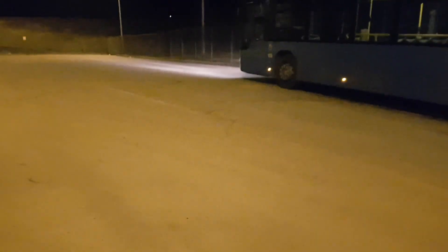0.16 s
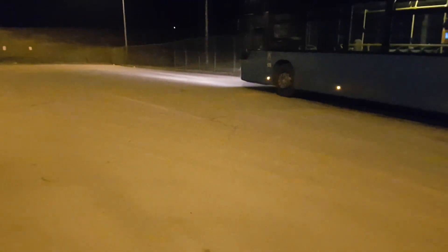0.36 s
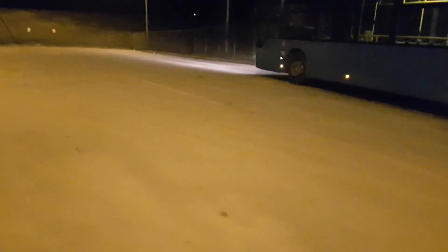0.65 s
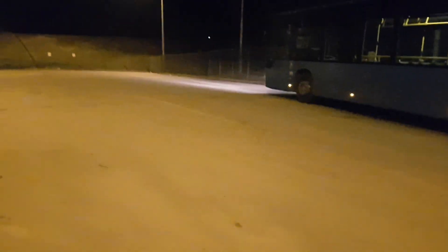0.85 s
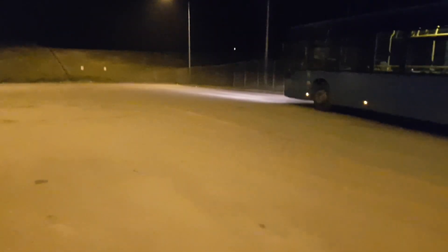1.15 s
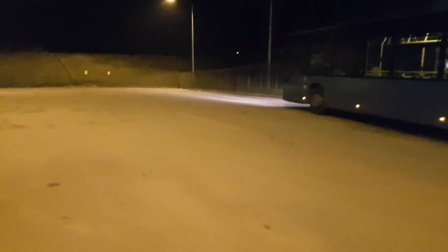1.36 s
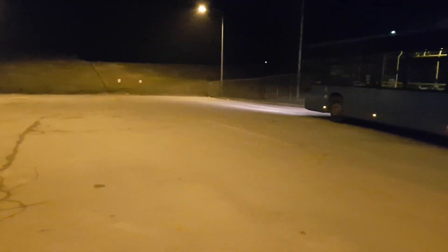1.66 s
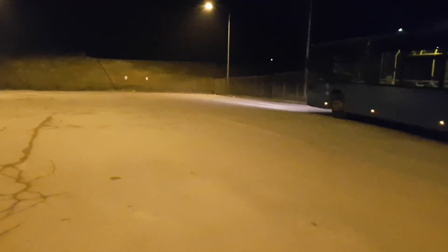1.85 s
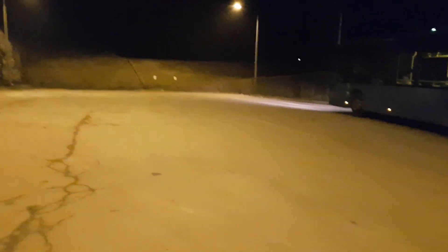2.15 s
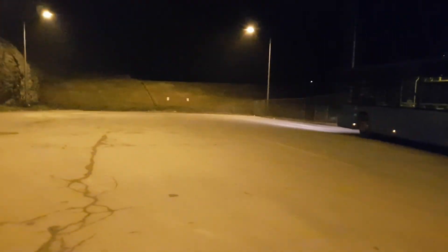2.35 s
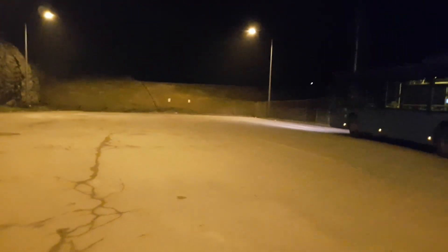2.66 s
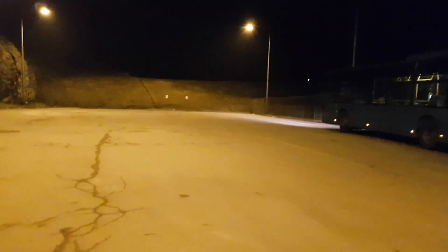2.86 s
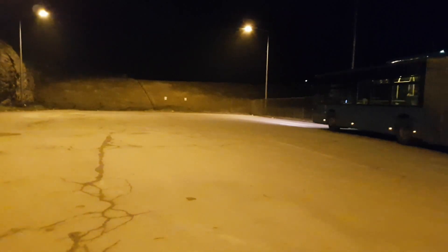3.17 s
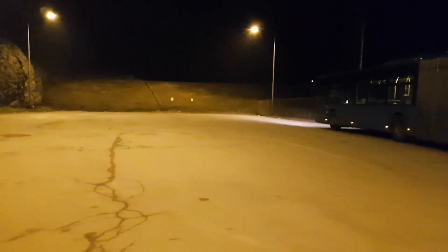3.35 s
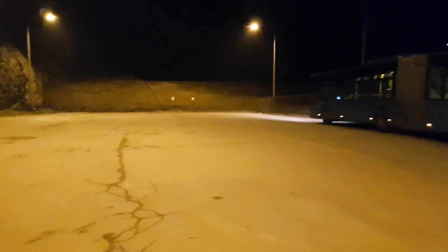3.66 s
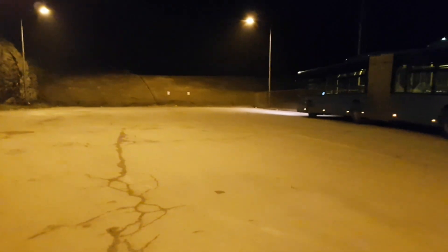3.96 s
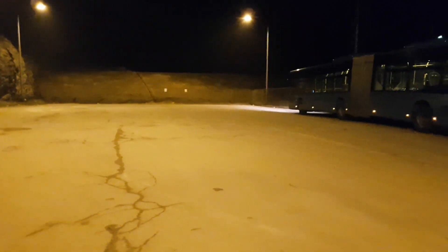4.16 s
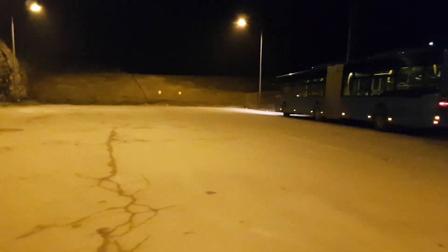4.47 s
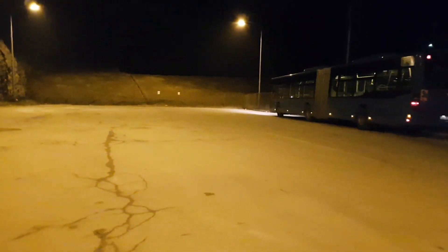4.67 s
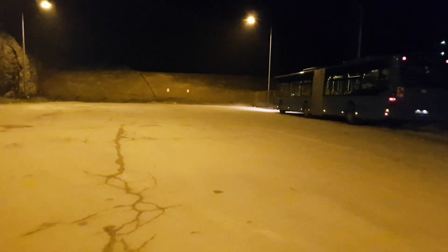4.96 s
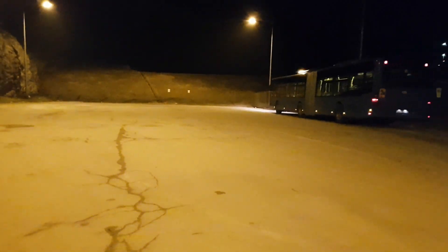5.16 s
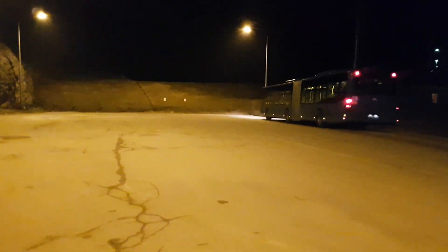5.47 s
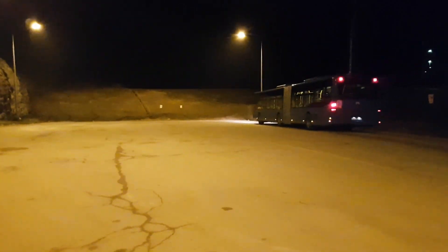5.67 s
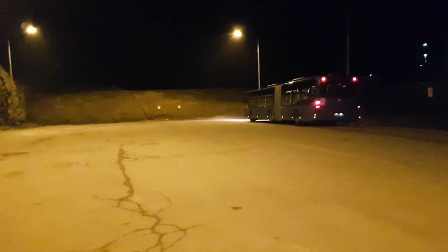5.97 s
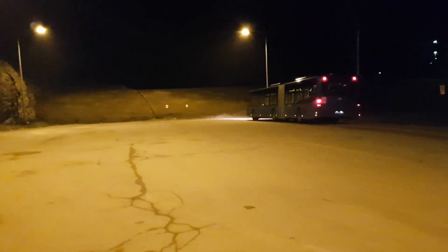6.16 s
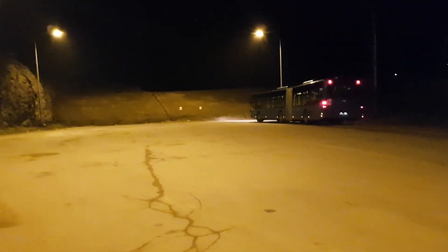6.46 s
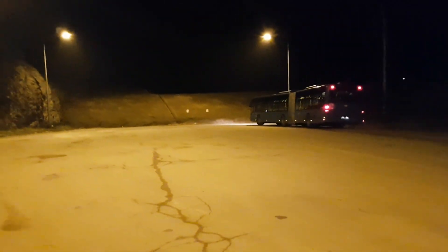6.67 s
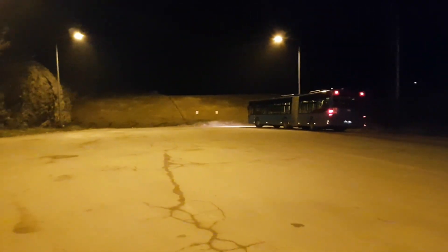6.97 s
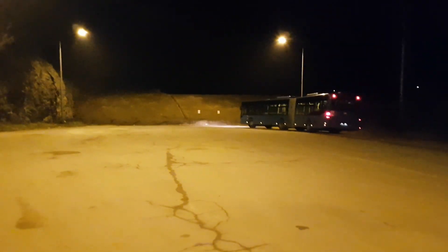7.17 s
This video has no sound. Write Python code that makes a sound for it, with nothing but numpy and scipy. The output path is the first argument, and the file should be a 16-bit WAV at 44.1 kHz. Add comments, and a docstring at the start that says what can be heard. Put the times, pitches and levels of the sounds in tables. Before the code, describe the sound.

Outdoors, a spaced microphone pair hears a heavy bus pulling away under power: deep throbbing exhaust, knocking diesel clatter, broad fan noise and geared whines rising together. After the driver lifts off, the whine sags and breaks up, leaving distant soft rumble and a faint fluttering axle hum, with small swells of roar at the end and occasional grit ticks.

```python
"""Articulated bus pulling away

A paved lot: a rear-engined diesel bus pulls away hard from about 8 m, lifts off and rolls on beyond 20 m.
Six unequal cylinders drive a booming exhaust and a clattering block; geared belt drives whine, the turbo
whistles with the revs, the tyres flick grit and the axle gears hum on the overrun.
A spaced pair of microphones hears the bus move from the right side towards the front."""
import sys
import numpy as np
from scipy import signal
from scipy.io import wavfile
from scipy.ndimage import uniform_filter1d, map_coordinates

SR = 44100
rng = np.random.default_rng(int(sys.argv[2]) if len(sys.argv) > 2 else 0)


def wrap_up_sound(samples):
    """Save the sound to the file named by the first command line argument, as 16-bit audio."""
    columns = np.atleast_2d(samples).T
    # keep every value between -1 and 1, then stretch to whole-number steps
    tamed = np.clip(columns, -1, 1)
    steps = np.round(tamed * 32767).astype(np.int16)
    wavfile.write(sys.argv[1], SR, steps)


N = 322812


def from_db(db):
    """Decibels to gain."""
    return 10 ** (np.asarray(db) / 20)


def rms_one(x):
    """Scale to unit rms."""
    return x / np.sqrt(np.mean(x ** 2) + 1e-20)


def steady(x):
    """Level out the power, averaged over half a second and over the channels, to about one."""
    power = np.mean(np.atleast_2d(x) ** 2, axis=0)
    return x / np.sqrt(uniform_filter1d(power, SR // 2) + 1e-20)


def in_time(rows):
    """Turn rows of (time, values...) into one curve per value column."""
    s, *columns = np.transpose(rows)
    return [np.interp(np.arange(N) / SR, s, c) for c in columns]


def at_hz(points, hz, column=1):
    """Read a column of a spectrum on a log-frequency axis."""
    table = np.array(points)
    return np.interp(np.log(hz), np.log(table[:, 0]), table[:, column])


def drift(rate_hz):
    """Smooth random wandering of spread one, drawn at every 40th sample."""
    step = 40
    pole = np.exp(-2 * np.pi * step * rate_hz / SR)
    settle = 2000  # discarded while the filter settles
    white = rng.standard_normal(N // step + settle + 2)
    slow = signal.lfilter([1], [1, -2 * pole, pole * pole], white)[settle:]
    return np.interp(np.arange(N) / step, np.arange(len(slow)), rms_one(slow))


def tone(turns, rough, flutter):
    """A unit-rms line with a share (rough) of side bands that flutter at random (flutter in Hz)."""
    angle = 2 * np.pi * (turns + rng.random())
    in_phase = (1 + rough * drift(flutter)) * np.sin(angle)
    quadrature = rough * drift(flutter) * np.cos(angle)
    return np.sqrt(2 / (1 + 2 * rough ** 2)) * (in_phase + quadrature)


def resonant_db(resonances, hz):
    """Level of a tone as its pitch sweeps through a set of resonances, whose powers add."""
    power = 0
    for centre, half_width, db in resonances:
        power = power + (from_db(db) / (1 + ((hz - centre) / half_width) ** 2)) ** 2
    return 10 * np.log10(power)


# microphone pair, left over right: (frequency [Hz], level difference [dB])
EAR_BALANCE = [(60, -0.8), (200, -1), (450, -0.5), (800, 0.9), (1300, 2.5), (1900, -3), (2450, -7.5),
               (3300, 2), (4600, 1), (8500, -2), (15000, -3)]


def ears(hz):
    """Left and right gain of the microphones at a frequency."""
    return from_db(at_hz(EAR_BALANCE, hz) * np.array([[.5], [-.5]]))


# side of the bus that faces the microphones: (time [s], aspect [0 flank, 1 tail, 2 far])
BUS_ASPECT = [(0, 0.1), (2.7, 0.05), (3.6, 0.77), (4.8, 1.16), (5.6, 1.55), (7.32, 1.64)]
# microphone pair: (frequency [Hz], likeness facing the flank [0-1], once reflections take over [0-1])
EAR_LIKENESS = [(100, .997, .997), (400, .985, .97), (1200, .96, .93), (2400, .82, .66), (5000, .74, .45),
                (14000, .6, .33)]


def noise_bands(low_hz, high_hz, count):
    """Yield (centre, stereo noise) in bands of equal density; the ears differ more as the bus turns away."""
    edges = np.geomspace(low_hz, high_hz, count + 1)
    white = rng.standard_normal((2, 2, N))  # neighbouring bands use different noise
    turned = np.clip(in_time(BUS_ASPECT)[0], 0, 1)
    for k in range(count):
        hz = np.sqrt(edges[k] * edges[k + 1])
        sos = signal.butter(3, edges[k:k + 2], "band", fs=SR, output="sos")
        mid, side = signal.sosfilt(sos, white[k % 2])
        alike = (1 - turned) * at_hz(EAR_LIKENESS, hz) + turned * at_hz(EAR_LIKENESS, hz, column=2)
        yield hz, ears(hz) * (np.sqrt(1 + alike) * mid + np.sqrt(1 - alike) * side * [[1], [-1]])


# engine speed: (time [s], firing rate [firings per s])
ENGINE_REVS = [(0, 40), (.4, 49), (.8, 56.3), (1.2, 62.6), (1.8, 71.7), (2.4, 79.2), (3, 85.1), (3.8, 91.3),
               (4.5, 95.9), (4.6, 95.8), (4.7, 93.5), (4.8, 88), (5, 73.6), (5.2, 65.2), (5.6, 55.2),
               (6.5, 54), (7.32, 49.5)]


def firing_rate():
    """Firings per second of the six cylinders together."""
    return in_time(ENGINE_REVS)[0]


# engine torque, greatest at mid revs: (time [s], load [0-1])
ENGINE_LOAD = [(0, 0.52), (2.4, 1), (3.6, 0.5), (4.7, 0.5), (4.95, 0.1), (5.5, 0.2), (7.32, 0.22)]


def engine_load():
    """Share of full torque."""
    return np.clip(in_time(ENGINE_LOAD)[0], 0, 1)


# the driver lifts off and the drive dies away
LIFT_OFF_S, RELEASE_S = 4.74, 0.11


def coasting(release_s):
    """0 on the throttle, rising to 1 after the lift-off with this time constant."""
    return 1 - np.exp(-np.maximum(np.arange(N) / SR - LIFT_OFF_S, 0) / release_s)


# distance of the rear engine from the microphones: (time [s], distance [m])
ENGINE_DISTANCE = [(0, 7.75), (2.5, 8.45), (3.3, 9.66), (4.4, 12.15), (5, 14.6), (5.6, 20.6), (6.3, 24.3),
                   (7.32, 21.8)]
# base levels hold at this engine speed (firings per s) and distance (m)
REFERENCE_RATE, REFERENCE_M = 80, 8


def level_db(base_db, per_octave_db, tail_db, coast_db):
    """A level changes with revs, falls with distance, and shifts when the tail faces us and off the throttle."""
    metres, aspect = in_time(ENGINE_DISTANCE)[0], in_time(BUS_ASPECT)[0]
    tail_on = np.clip(1 - np.abs(aspect - 1), 0, 1)
    revs_db = per_octave_db * np.log2(firing_rate() / REFERENCE_RATE)
    distance_db = -20 * np.log10(metres / REFERENCE_M)
    return base_db + revs_db + distance_db + tail_db * tail_on + coast_db * coasting(RELEASE_S)


# tailpipe resonances that the firing harmonics sweep through: (centre [Hz], half width [Hz], level [dB])
TAILPIPE_RESONANCES = [(45, 11, -23), (87, 30, -24.5), (123.7, 10.5, -19.5), (145, 11, -19),
                       (175.2, 21, -22), (192.9, 6.1, -16.5), (248, 12, -23.5), (264.4, 8.6, -26)]
# offsets of the first and third firing harmonics against the second, before the pipe
FIRST_DB, THIRD_DB = 5.5, -3.0
# off the throttle the firing tones ebb away: eventual change and time constant
EBB_DB, EBB_S = -20.5, 1.15


def firing_tone(rate, firings):
    """Three harmonics of the firing rate sweep through the tailpipe; off load they ebb and roughen."""
    coast = coasting(RELEASE_S)
    drive_db = level_db(base_db=0.62, per_octave_db=1.4, tail_db=3.0, coast_db=-1.5)
    drive_db = drive_db + EBB_DB * coasting(EBB_S)
    soft_db = -7.0 * coast  # unfuelled firings lose their overtones first
    uneven = 0.48 * coast   # and their regularity
    first_db, second_db, third_db = [
        drive_db + resonant_db(TAILPIPE_RESONANCES, k * rate) for k in (1, 2, 3)]
    first = from_db(FIRST_DB + first_db) * tone(firings, rough=0.092 + uneven, flutter=13.5)
    second = from_db(second_db + soft_db) * tone(2 * firings, rough=0.08 + uneven, flutter=4.0)
    third = from_db(THIRD_DB + third_db + soft_db) * tone(3 * firings, rough=0.15 + uneven, flutter=5.6)
    return (first + second + third) * ears(90)


# further multiples of the six-firing cycle, uneven orders and the higher firing harmonics:
# (multiple [1], relative level [dB])
EXHAUST_ORDERS = [(3, -2.5), (5, -10), (7, -6.5), (8, -19), (9, 2), (10, -1), (11, 1), (13, -3), (14, -5.5),
                  (15, 2.5), (16, -11), (17, -6), (19, -3), (20, -8.5), (21, -4), (22, -6.5), (23, -5.5),
                  (24, 0), (26, -29), (27, -5), (28, -13), (30, 0.5), (33, -2), (36, -2), (39, -11.5),
                  (42, -5.5), (48, -11)]
# exhaust pipe response: (frequency [Hz], relative level [dB])
PIPE_RESPONSE = [(40, -15), (75, -8), (100, -11.5), (116, -0.5), (130, -20), (152, -8.5), (172, -3),
                 (195, 5), (225, -10), (270, -5), (330, -12), (400, -21.5), (520, -10)]


def cycle_orders(rate, firings):
    """Lines at multiples of the engine cycle, a sixth of the firing rate, sweep through the pipe response."""
    out = 0
    for multiple, db in EXHAUST_ORDERS:
        order = round(multiple)
        pipe_db = at_hz(PIPE_RESPONSE, order * rate / 6)
        out = out + from_db(db + pipe_db) * tone(order * firings / 6, rough=.3, flutter=3.0)
    return steady(out) * ears(150)


# turbulent exhaust rumble: (frequency [Hz], relative density [dB per Hz])
RUMBLE_SPECTRUM = [(25, -29), (55, -8.5), (90, -0.5), (135, 4.5), (190, -5.5), (260, -3.5), (350, -19.5),
                   (500, -48)]


def exhaust_rumble():
    """Turbulence in the pipe: low noise at unit rms."""
    bands = noise_bands(21.24, 504.5, count=11)
    return rms_one(sum(from_db(at_hz(RUMBLE_SPECTRUM, hz)) * band for hz, band in bands))


# the boom peaks at one firing rate, where a cycle order meets the main pipe resonance
BOOM_AT_HZ, BOOM_WIDTH_HZ, BOOM_RISE_DB = 76.9, 2.06, 5


def exhaust_boom(rate, firings):
    """Cycle orders under load give way to turbulent rumble off load."""
    boom_db = level_db(base_db=-18.5, per_octave_db=9.0, tail_db=-2.0, coast_db=-0.9)
    on_throttle = 1 - coasting(RELEASE_S)
    boom_db = boom_db + BOOM_RISE_DB * on_throttle / (1 + ((rate - BOOM_AT_HZ) / BOOM_WIDTH_HZ) ** 2)
    tonal = np.clip(0.95 * engine_load() ** 0.93, 0, 1)  # share of power in the orders
    orders, rumble = cycle_orders(rate, firings), exhaust_rumble()
    return from_db(boom_db) * (np.sqrt(tonal) * orders + np.sqrt(1 - tonal) * rumble)


def knocks(firings, depth, sharpness, uneven_db):
    """Each firing gives a burst that dies before the next; every cylinder and stroke varies in strength."""
    stroke = firings.astype(int)
    by_cylinder = rng.standard_normal(size=6)[stroke % 6]
    by_stroke = rng.standard_normal(size=1024)[stroke]
    strength = from_db(uneven_db * (by_cylinder + by_stroke))
    return rms_one(1 + depth * strength * np.exp(-sharpness * (firings % 1)))


# machinery colour by aspect: (frequency [Hz], flank level [dB], tail level [dB], far level [dB]), all relative
ASPECT_COLOUR = [(335, 3, -1.5, -15), (466, -8.5, 2, -9.5), (626, -6, 4, -10), (815, -4, -7, -7),
                 (1480, 0, 6, -1.5), (1780, -2.5, 8.5, -12), (2730, -13, -5.5, -10), (3220, -13, -11, 1.5),
                 (3900, -19, -13.5, -24), (4570, -17.5, -13, -11.5), (6630, -35, -19.5, -18.5),
                 (9600, -29, -19, -19.5), (11100, -29, -25, -18), (15000, -30, -24.5, -26)]


def coloured(low_hz, high_hz, count, patchy_db):
    """Noise whose colour follows the side of the bus that faces the microphones, with random patches."""
    aspect = in_time(BUS_ASPECT)[0]
    out = 0
    for hz, band in noise_bands(low_hz, high_hz, count):
        by_aspect = [at_hz(ASPECT_COLOUR, hz, column=k) for k in (1, 2, 3)]
        colour_db = np.interp(aspect, np.arange(3), by_aspect)
        out = out + band * from_db(colour_db + patchy_db * drift(12.0))
    return steady(out)


# roar and clatter swell as the bus swings round: (start [s], length [s], level [dB])
SWING_SWELLS = [(6.283, 0.22, 2.0), (6.653, 0.36, 4.5), (7.044, .3, 4.0)]
SWELL_RAMP_S = 0.097


def swells_db():
    """Each swell rises, holds and falls back; the fall follows its length."""
    t = np.arange(N) / SR
    out = 0
    for start, length, db in SWING_SWELLS:
        ramps = np.minimum(t - start, start + length + SWELL_RAMP_S - t) / SWELL_RAMP_S
        out = out + db * np.clip(ramps, 0, 1)
    return out


def fan_roar(pulse):
    """Broad low-mid fan noise, gently pulsing with the firings."""
    roar_db = level_db(base_db=-24.0, per_octave_db=4.0, tail_db=2.5, coast_db=-2.5) + swells_db()
    return from_db(roar_db) * coloured(286.2, 1188, count=8, patchy_db=1.25) * rms_one(pulse + 1)


def block_clatter(pulse):
    """Combustion knocks excite the panels and the block in noise bursts, one per firing."""
    swell_db = swells_db()
    panel_db = level_db(base_db=-26.0, per_octave_db=6.5, tail_db=0.4, coast_db=-2.0) + swell_db
    clatter_db = level_db(base_db=-27.1, per_octave_db=9.0, tail_db=0.9, coast_db=-1.5) + swell_db
    panels = from_db(panel_db) * coloured(1224, 1921, count=3, patchy_db=1.4)
    clatter = from_db(clatter_db) * coloured(1909, 5435, count=10, patchy_db=1.04)
    return (panels + clatter) * pulse


def crackling_hiss(pulse):
    """High noise with a fast random crackle, gently pulsing with the firings."""
    hiss_db = level_db(base_db=-37.0, per_octave_db=15.5, tail_db=0.54, coast_db=1.5)
    crackle = rms_one(from_db(0.84 * drift(65)))
    return from_db(hiss_db) * coloured(5540, 16900, count=10, patchy_db=1.0) * crackle * rms_one(pulse + 1)


def machinery(firings):
    """Fan, block and hiss share the same train of firings."""
    pulse = knocks(firings, depth=.62, sharpness=4.0, uneven_db=2.2)
    return fan_roar(pulse) + block_clatter(pulse) + crackling_hiss(pulse)


# ground reflection of the whines: (time [s], phase between the microphones [turns])
WHINE_APART = [(0, .4), (1.4, .38), (2.1, .31), (2.9, .27), (3.4, .26), (4, .32), (4.5, .36), (7.32, .38)]


def scattered(turns, rough, flutter=8):
    """Reflections from body and ground set a whine out of step at the two microphones, wandering slowly."""
    wave = signal.hilbert(tone(turns, rough, flutter))
    apart = np.exp(2j * np.pi * (in_time(WHINE_APART)[0] + .04 * drift(1)))
    return np.real([wave / apart, wave])


# engine bay resonances that both belt whines sweep through: (centre [Hz], half width [Hz], level [dB])
BAY_RESONANCES = [(1230, 110, -37), (1330, 26, -31.5), (1415, 30, -24), (1605, 32, -24), (1725, 58, -27.8)]
ALTERNATOR_RATIO, PUMP_RATIO = 18.27, 16.7  # whine frequency per firing rate
PUMP_LOW_DB = -39  # the pump's lower octave, against the belt level


def belt_whines(rate, firings):
    """Alternator and pump, geared to the crank, whine through the engine bay resonances."""
    belt_db = level_db(base_db=-1.65, per_octave_db=-4.0, tail_db=4.5, coast_db=-0.5)
    alternator_db = belt_db + resonant_db(BAY_RESONANCES, ALTERNATOR_RATIO * rate)
    pump_db = level_db(base_db=-2.5, per_octave_db=20.0, tail_db=-4.5, coast_db=-1.0)
    pump_db = pump_db + resonant_db(BAY_RESONANCES, PUMP_RATIO * rate)
    load = engine_load()
    slack = .45 + .7 * coasting(RELEASE_S)  # off load the belt flaps and the tones break up
    # overtones escape through the rear grille
    grille = load * np.clip(in_time(BUS_ASPECT)[0] + 0.37, 0, 1)

    alternator, pump = ALTERNATOR_RATIO * firings, PUMP_RATIO * firings
    alternator_octave = from_db(-4) * scattered(2 * alternator, rough=0.67, flutter=19)
    pump_overtones = from_db(-10) * scattered(1.5 * pump, rough=.9)
    pump_overtones += from_db(-13) * scattered(2 * pump, rough=.9)
    whines = from_db(alternator_db) * (scattered(alternator, slack) + grille * alternator_octave)
    whines += from_db(pump_db) * (scattered(pump, slack) + grille * pump_overtones)
    whines += load * from_db(belt_db + PUMP_LOW_DB) * tone(pump / 2, rough=0.11, flutter=5.1)
    return whines * ears(ALTERNATOR_RATIO * rate)


# intake duct resonance that lets the turbo whistle out: (centre [Hz], half width [Hz], level [dB])
INTAKE_RESONANCE = [(8900, 480, -40.3)]
# the blade tone is a multiple of the firing rate, a little late
TURBO_RATIO, TURBO_LATE_S = 101.4, .04
BREATH_DB = -0.5  # rush of air against the whistle it surrounds


def turbo_whistle(rate):
    """The blade tone follows the revs late, blurred by rushing air, and sweeps through the intake duct."""
    samples = np.arange(N)
    turbo_hz = TURBO_RATIO * np.interp(samples - TURBO_LATE_S * SR, samples, rate)
    blades = np.cumsum(turbo_hz) / SR
    channels = []
    for _ in range(2):
        breath = from_db(BREATH_DB) * tone(blades, rough=5.0, flutter=380)
        channels.append(tone(blades, rough=3.0, flutter=110) + breath)
    return np.array(channels) * from_db(resonant_db(INTAKE_RESONANCE, turbo_hz)) * ears(turbo_hz)


# grit snapping under the tyres: (time [s], peak level [dB], ring frequency [Hz])
GRIT_SNAPS = [(1.006, -28, 9000), (1.268, -33, 1500), (1.751, -28, 9000), (3.027, -31, 9000),
              (3.466, -32, 8000), (5.625, -35, 10000), (5.771, -36, 1600), (6.645, -37, 6000),
              (7.246, -39, 10000), (7.283, -30, 6970)]


def grit(decay_s=.002):
    """Each stone gives a short, broadly tuned snap: decaying noise through a wide band."""
    out, t = np.zeros(N), np.arange(SR // 40) / SR
    for s, db, hz in GRIT_SNAPS:
        band = [hz * .55, min(hz * 1.7, .45 * SR)]
        sos = signal.butter(1, band, "band", fs=SR, output="sos")
        snap = signal.sosfilt(sos, rng.standard_normal(len(t)) * np.exp(-t / decay_s))
        at = int(s * SR)
        out[at:at + len(t)] += (from_db(db) * snap / np.abs(snap).max())[:N - at]
    return out


# axle gears hum on the overrun: (time [s], pitch [Hz], level [dB])
AXLE_HUM = [(0, 400, -80), (4.7, 467, -59), (5.05, 457.5, -73), (5.6, 454, -45), (5.95, 452.5, -45),
            (6.2, 452, -54), (6.45, 455, -46), (6.9, 474, -50), (7.32, 480, -61)]


def axle_hum():
    """The axle gears sound one fluttering tone along its own pitch and level curves, alike at both microphones."""
    axle_hz, axle_db = in_time(AXLE_HUM)
    return from_db(axle_db) * tone(np.cumsum(axle_hz) / SR, rough=0.71, flutter=11)


# bearing of the bus: (time [s], lag of the left microphone [ms])
LEFT_LAG = [(0, .44), (1.8, .45), (3.25, 0.38), (4.75, 0.2), (6, 0.11), (7.32, 0.065)]


def scene():
    """Exhaust, machinery and grit reach the left microphone later than the right; the whines are not lagged."""
    rate = firing_rate()
    firings = np.cumsum(rate) / SR
    left, right = firing_tone(rate, firings) + exhaust_boom(rate, firings) + machinery(firings) + grit()
    late = np.arange(N) - in_time(LEFT_LAG)[0] * SR / 1000
    left = map_coordinates(left, [late], order=5, mode="nearest")
    return np.array([left, right]) + belt_whines(rate, firings) + turbo_whistle(rate) + axle_hum()


CUTOFF_HZ = 15950


def record(dry):
    """The top is cut steeply."""
    return signal.sosfilt(signal.ellip(12, .1, 80, CUTOFF_HZ, fs=SR, output="sos"), dry)


dry = scene()
out = record(dry)
wrap_up_sound(out)
```